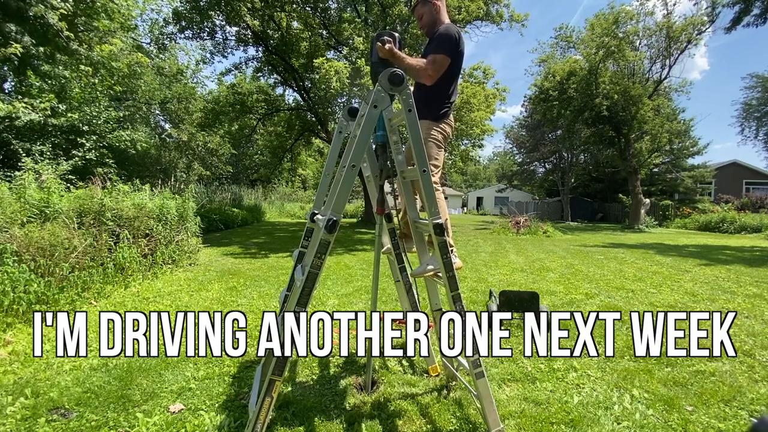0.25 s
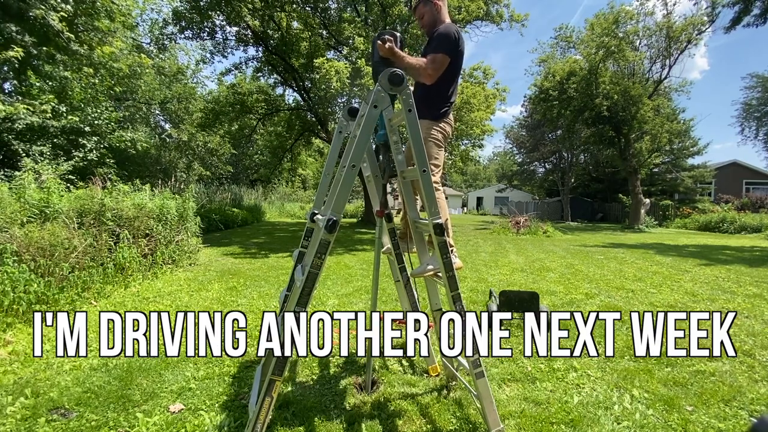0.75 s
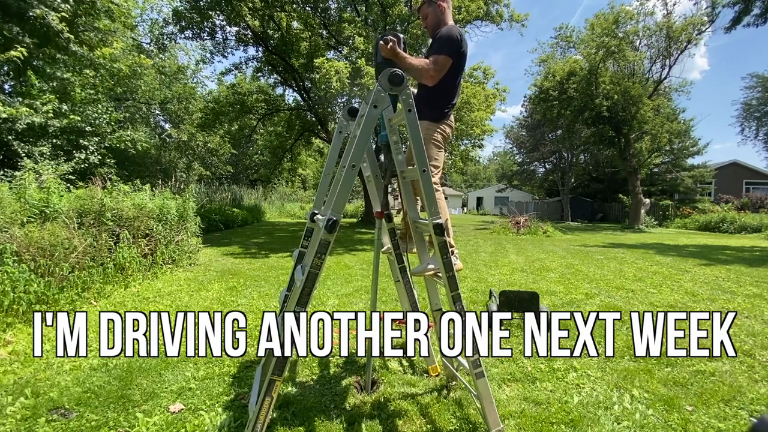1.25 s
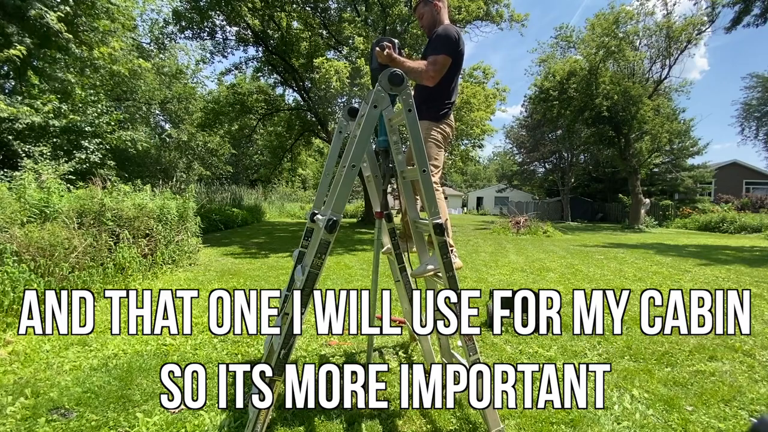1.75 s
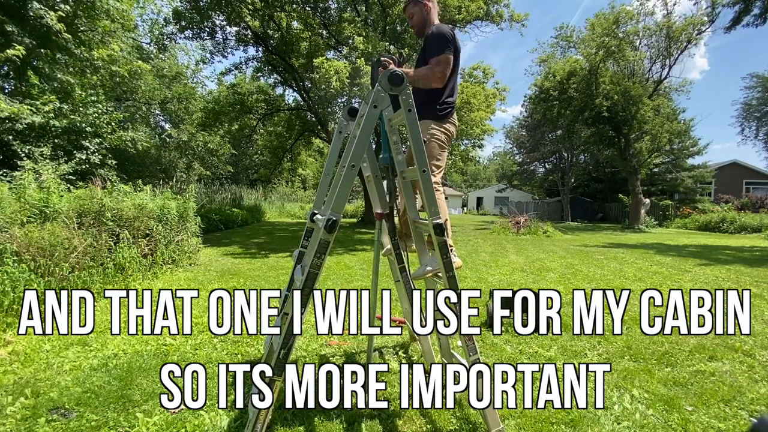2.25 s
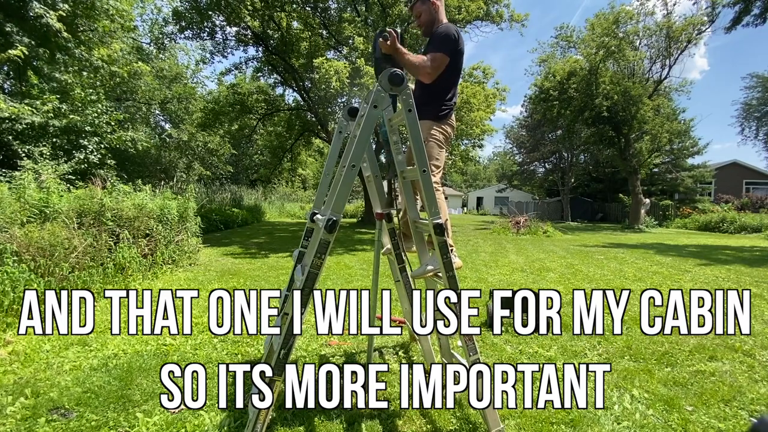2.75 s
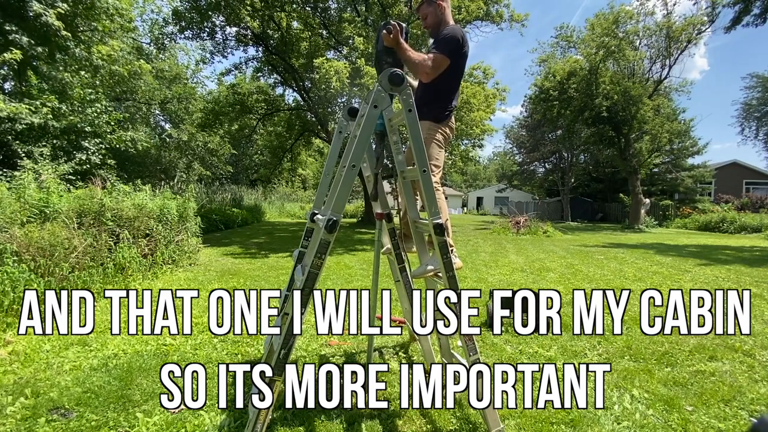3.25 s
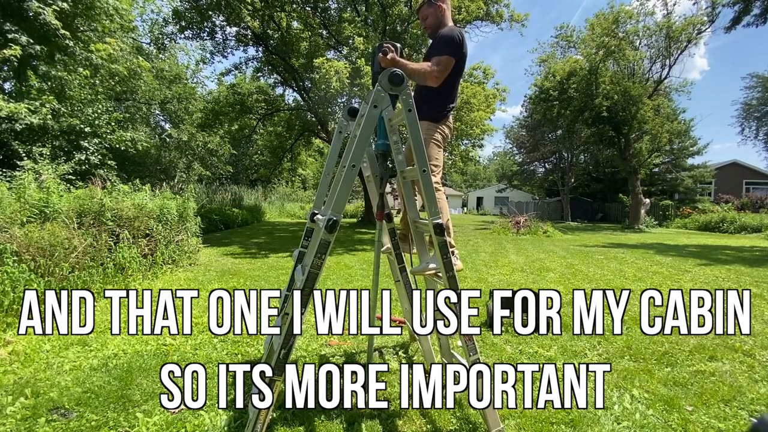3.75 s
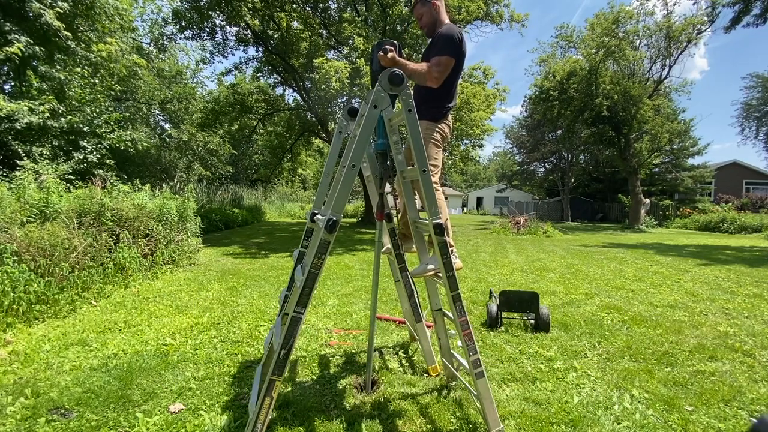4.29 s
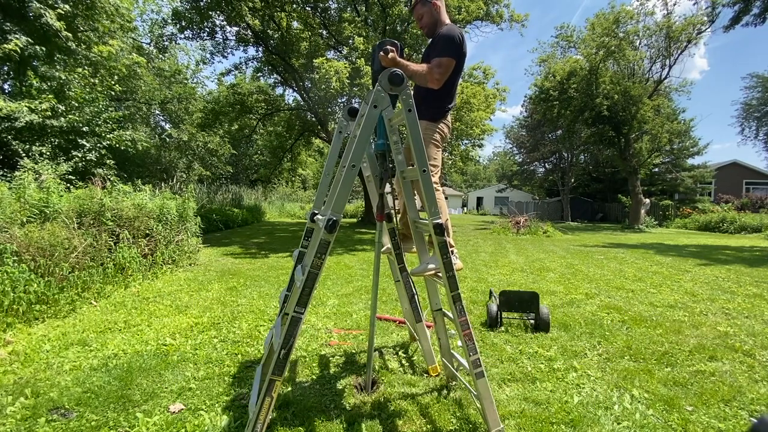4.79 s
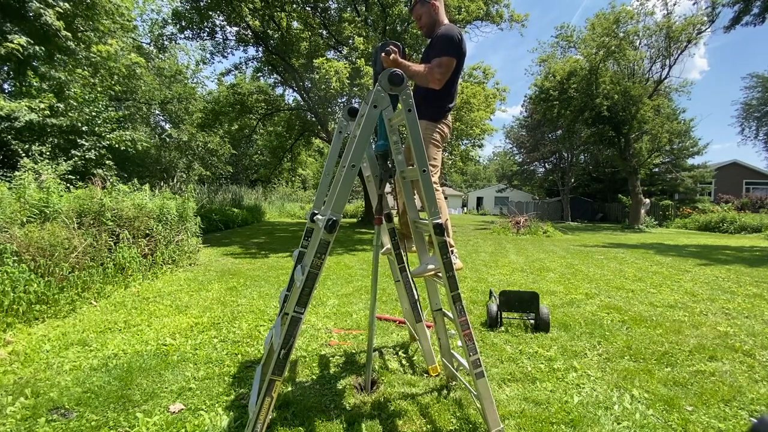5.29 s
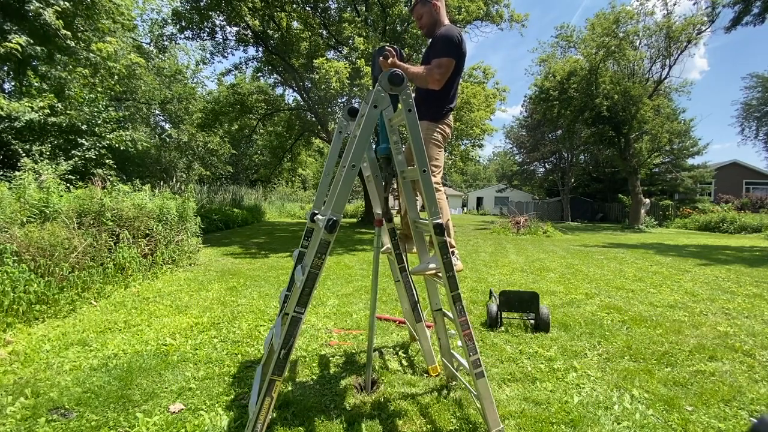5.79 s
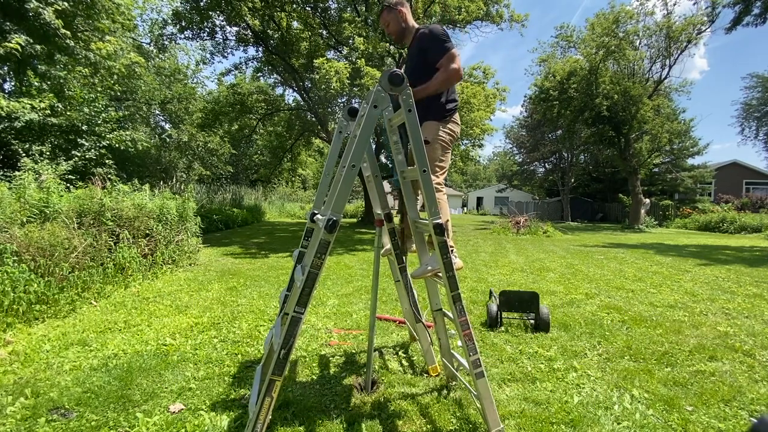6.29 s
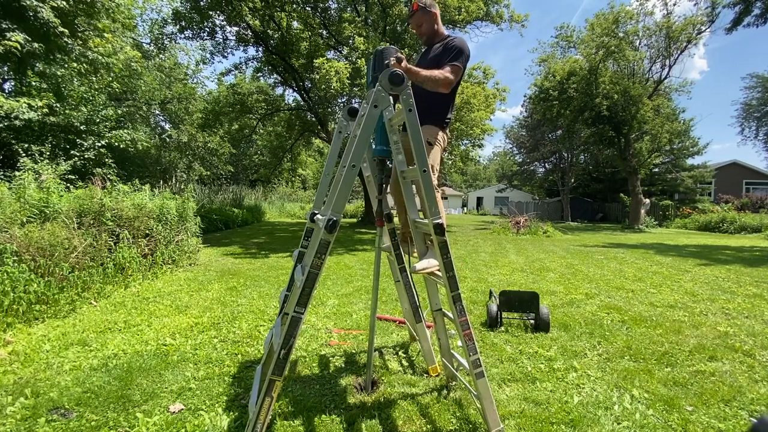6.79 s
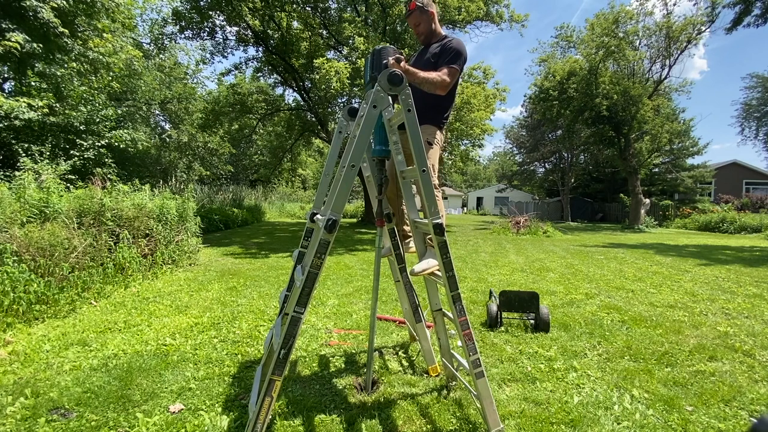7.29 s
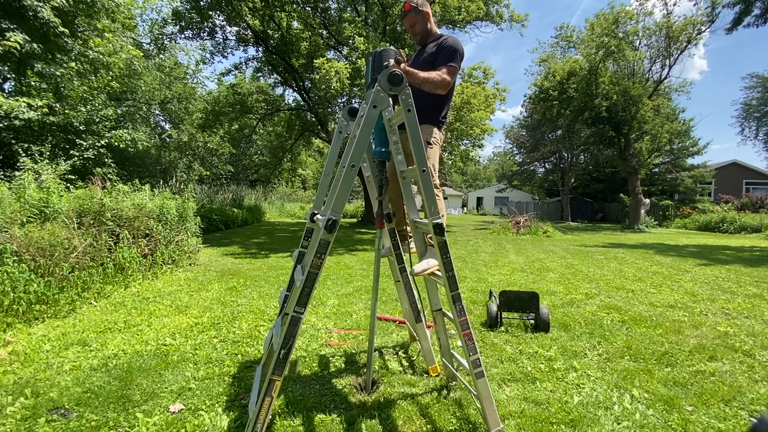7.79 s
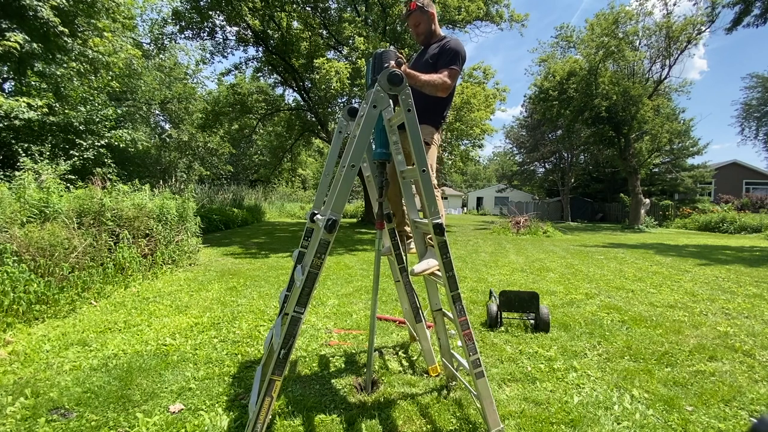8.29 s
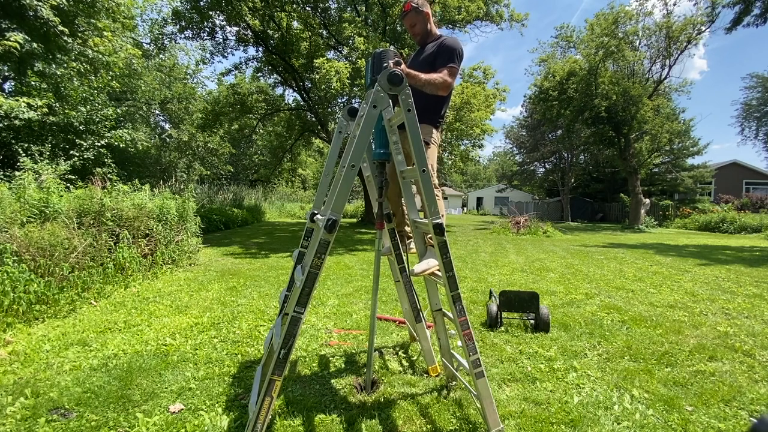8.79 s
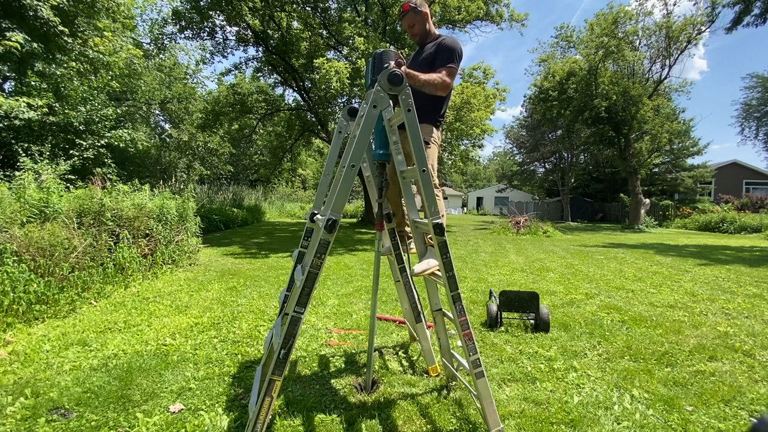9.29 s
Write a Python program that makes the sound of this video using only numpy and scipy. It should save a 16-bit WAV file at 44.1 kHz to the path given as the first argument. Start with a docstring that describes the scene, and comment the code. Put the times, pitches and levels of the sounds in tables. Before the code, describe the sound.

An electric jackhammer drives a steel pipe in a back yard, a few metres from the microphone. Two short bursts of fast, rattling blows ring with high metallic tones, then the motor idles down with gear noise and a thin whine. Light taps build into a longer burst. The motor runs down again, leaving a faint rumble of far traffic, before the blows return, ease off and pick up.

```python
"""A back yard, two-port microphone a few metres from an electric jackhammer driving a steel pipe. It opens on
two short bursts: each blow rattles steel on the cap, and the bit bounces free, rings, and is muted on landing.
From 2.3 s the motor idles down: gear noise, piston chuffs, a thin whine. Light taps at 3.5 s build to a long
burst; after 6.2 s the motor runs down again, leaving far traffic to rumble and hum. From 7.3 s the blows
return, ease off and pick up to the end."""
import sys
import numpy as np
from scipy import signal
from scipy.fft import rfft, irfft, next_fast_len
from scipy.io import wavfile
from scipy.ndimage import uniform_filter1d, map_coordinates

SR = 44100
rng = np.random.default_rng(int(sys.argv[2]) if len(sys.argv) > 2 else 0)


def wav_out(sig):
    """Save sig, one row per channel (or a flat mono array), as 16-bit PCM at SR to the path in sys.argv[1]."""
    wavfile.write(sys.argv[1], SR, np.round(np.clip(np.atleast_2d(sig).T, -1, 1) * 32767).astype(np.int16))


N = 420713
TIME = np.arange(N) / SR

# bit meets cap: t/s, rattle/dB, free flight/s, 5 kHz ring/dB, 6 kHz ring/dB, upper ring/dB
CONTACTS = [(0.161, -16.5, .091, -29, -38, -34), (0.2439, -12, .074, -53, -60, -43.5),
            (0.3378, -15.5, .056, -42.5, -39, -44), (0.4323, -14.5, .066, -38.5, -34, -45),
            (0.5304, -17, .08, -32.5, -34.5, -35.5), (.6306, -13.5, .057, -56, -62, -50.5),
            (.73, -15, .13, -38.5, -37, -39.5), (.832, -31.5, .037, -48, -42.5, -43),
            (.862, -41, .0645, -42.5, -40, -46.5), (0.9848, -14.5, .076, -31, -22, -32.5),
            (1.0662, -14.5, .043, -30, -23, -35.5), (1.117, -35, .12, -47, -28, -38),
            (1.203, -40, .048, -50, -34, -38.5), (1.254, -42, .17, -56, -36, -32.5),
            (1.385, -40.5, .32, -58, -60, -65), (1.9101, -14, .062, -28.5, -21.5, -30.5),
            (1.9784, -11.5, .024, -64, -24, -26.5), (2.002, -34, .037, -51.5, -38, -42),
            (2.054, -16.5, .084, -35, -23.5, -41), (2.1374, -21.5, .024, -54.5, -21.5, -35),
            (2.2212, -18, .095, -56, -37.5, -37.5), (2.315, -43, .15, -66, -56, -50),
            (3.467, -34.5, .025, -54, -48, -52), (3.4892, -31, .062, -56.5, -60.5, -58),
            (3.5532, -33.5, .18, -74, -83, -73), (3.7062, -28, .023, -47.5, -67, -46.5),
            (3.9196, -30, .037, -56, -47, -56), (4.1517, -25, .037, -50, -54, -60),
            (4.348, -28.5, .038, -61, -56, -65), (4.4774, -19.5, .03, -35.5, -62, -39.5),
            (4.5907, -17, .059, -40, -43, -43), (4.7897, -13.5, .037, -32.5, -46, -40),
            (4.879, -14, .074, -42, -52, -43.5), (4.9676, -14.5, .089, -31.5, -46, -34.5),
            (5.057, -14.5, .062, -56, -55, -39.5), (5.1427, -15, .066, -41.5, -40.5, -40),
            (5.2298, -13.5, .068, -30.5, -46.5, -45), (5.3168, -13, .028, -33.5, -64.5, -43.5),
            (5.4058, -15, .055, -55, -60.5, -65), (5.501, -26, .082, -40.5, -34, -43),
            (5.652, -22.5, .14, -43.5, -25, -42), (5.74, -14.5, .13, -40, -20.5, -34),
            (5.832, -19, .116, -34.5, -18, -35.5), (5.949, -28, .16, -59.5, -48, -50),
            (6.038, -43, .03, -65, -58, -62), (6.079, -22, .093, -44.5, -37.5, -48),
            (6.166, -36, .2, -72, -58, -64.5), (7.2885, -25.5, .036, -53, -44.5, -53),
            (7.4199, -18.5, .04, -38.5, -36, -40), (7.5326, -14, .077, -39.5, -41, -43.5),
            (7.6294, -27.5, .05, -57, -62, -61), (7.7307, -16, .085, -42.5, -25.5, -33.5),
            (7.82, -15, .072, -37, -42, -45), (7.916, -16.5, .099, -44.5, -36.5, -36.5),
            (8.0231, -18, .016, -44, -51, -55), (8.041, -42, .033, -44, -60, -56.5),
            (8.1436, -15.5, .042, -36.5, -58, -42), (8.2873, -20.5, .025, -51, -57.5, -55.5),
            (8.3136, -31.5, .026, -34, -60, -48), (8.4623, -29, .051, -65, -57, -64),
            (8.6772, -26.5, .032, -52.5, -73, -74), (8.8617, -29, .026, -66, -61, -61),
            (8.9957, -19, .033, -33, -49, -47), (9.111, -16, .048, -30.5, -38, -33.5),
            (9.217, -13, .04, -49.5, -35.5, -39), (9.318, -15.5, .077, -30, -42, -39.5)]
PIPE_MODES = [(830, 130, -3), (1300, 81, -2), (1660, 30, -5.5), (2528, 68, -3), (2997, 210, -8.5),
              (6340, 210, 3.5)]  # fuzzy modes of pipe and cap: f/Hz, width/Hz, level/dB
KNOCKS = [(1.9783, -32), (2.054, -38), (3.5524, -39), (6.166, -52), (9.4667, -53)]  # low knocks: t/s, level/dB
# spectra of the parts of a blow: f/Hz, level/dB
RATTLE_EQ = [(300, -34.5), (600, -8), (900, -5), (2000, 1), (4000, 1), (5500, 3.5), (7000, -16.5),
             (9000, -35)]
SIZZLE_EQ = [(4500, -27.5), (6400, 2.5), (7500, 0), (8400, 1), (9500, -3), (11000, -0.5), (12200, 3),
             (13500, -4), (16000, -11.5), (17000, -35.5)]
THUD_EQ = [(30, -28.5), (70, -0.5), (150, -3.5), (280, -2), (500, -2), (900, -36)]
KNOCK_EQ = [(40, -24.5), (100, -8), (250, -1), (400, -3.5), (900, -33)]
# modes of the bit: f/Hz, t60/s, beat/Hz, beat depth/0-1, flutter/dB, bend under load/0-1
BIT_MODES = [(5021, 0.34, 33, 0.4, 3, 0.5), (5990, 0.66, 6, 0.4, 1.23, 0.98),
             (8145, 0.38, 29, 0.5, 2.4, 0.2), (11860, .5, 52, 0.4, 2, 0.1), (15655, .35, 38, .4, 3.5, 0.1)]
# its modes above 6 kHz: share of the 5 kHz ring in a mix with the upper ring/0-1, level/dB re that mix
UPPER_MODES = [(.45, -3), (0, -0.5), (0.05, -3)]
# modes that ring along: f/Hz, leader near f/Hz, level/dB re leader, extra loss/(dB/s), dB per dB of rattle
PARTNER_MODES = [(2536, 5981, -17, 90, .5), (12905, 8125, -6, 0, 0)]
# the bit slides onto the cap and stiffens, its pitch climbing until landing: contact t/s, rise/0-1
PITCH_RISES = [(.864, .025), (5.5015, .045), (7.819, .03)]
SWELLS = [(.862, 0), (5.74, 22), (7.7307, 31), (7.916, 15)]  # the pipe feeds the 5 kHz mode in flight: contact t/s, gain by landing/dB
GEAR_LEVEL = [(0, -43), (.5, -44.5), (1.3, -45), (1.85, -42.5), (2.3, -47), (2.9, -51.5), (4.2, -55),
              (4.7, -44), (5.3, -42), (5.9, -44.5), (6.3, -55), (6.86, -61), (6.885, -68), (7.3, -51),
              (7.8, -42.5), (8.7, -54), (9.1, -44.5), (9.54, -47)]  # gear noise: t/s, level/dB
# spectra of gears and fan: f/Hz, level/dB
GEAR_EQ = [(120, -37.5), (200, -11.5), (444, -9), (573, -7.5), (751, -5), (1640, -1), (1790, -5.5),
           (2220, -3), (6000, -21.5), (7800, -50), (13200, -120)]
FAN_EQ = [(2300, -29.5), (4000, -3.5), (8800, -7), (11700, -9), (12600, -6), (13300, -41.5)]
# runs of strokes that miss the bit: first t/s, count, first period/s, ratio of each period to the last
IDLE_RUNS = [(.076, 1, .09, 1), (.905, 1, .08, 1), (1.305, 1, .07, 1), (1.447, 7, .066, 1),
             (2.3, 11, .0835, 1.056), (4.695, 1, .1, 1), (6.335, 4, .157, 1.095), (9.415, 2, .075, 1)]
# parts of a piston stroke: offset/periods, chuff/dB re gears, tick/dB re fan
STROKE_PARTS = [(-.2, 9.5, 4), (0.001, 9, 14), (.33, 6, 3)]
WHINES = [
    [(1.4, 4080, -60), (1.65, 4430, -57), (1.85, 4650, -59)],
    [(2.5, 3150, -73), (2.8, 2680, -71), (3.2, 2220, -76), (3.46, 1800, -75)],
    [(6.3, 2550, -81), (6.87, 1990, -83)],
    [(8.86, 1870, -57), (9.17, 2990, -52)],
]  # stretches of commutator whine: t/s, bar rate/Hz, level/dB
WHINE_HARMONICS = [
    [2],
    [4, 5, 6],
    [3],
    [1],
]  # multiples of the bar rate heard in each stretch
TRAFFIC_LEVEL = [(0, -61.5), (2, -65.5), (3.3, -63.5), (5, -58.5), (6.5, -60.5), (8.7, -54), (9.54, -57)]  # far rumble: t/s, level/dB
TRAFFIC_EQ = [(20, -51.5), (34, -12.5), (55, 0), (95, -1), (125, -8.5), (180, -14.5), (450, -17),
              (900, -16.5), (1500, -43.5)]  # its spectrum: f/Hz, level/dB
ENGINE_HUM = [(1.1, 72, -74.5), (1.5, 74, -68.5), (2.3, 86, -60.5), (3.4, 96, -67.5), (4.3, 106, -59.5),
              (4.6, 108, -70.5), (5.6, 88, -73.5), (6.2, 87, -55), (6.8, 87, -53), (6.95, 87, -82)]  # far engine: t/s, f/Hz, level/dB
# microphone ports: f/Hz, left minus right/dB, left phase lead/rad, coherence/0-1
MIC_PORTS = [(90, -5, 0.03, 0.5), (250, -6.5, -0.6, 1), (420, -9, -3, 0.4), (530, -7.5, -3, .9),
             (705, 2, -4.5, 1), (1220, -2.5, -5.5, 0.99), (1600, -3.9, -5.5, .93), (3130, -1, -5.5, 0.6),
             (4630, 0.1, -5, 0.9), (5900, -1.5, -5.5, 0.4), (8005, -3.8, -8, 0.4), (8530, -9.5, -8, 0.4),
             (10420, 3, -12, 1), (10940, -2, -11, .85), (12800, 0, -16, 1), (16100, -0.5, -24, 0.96),
             (16110, 0.5, -15, .93)]

BLOW_SCATTER_DB, STROKE_SCATTER_DB = 1.5, 2.2  # chance variation from one to the next
THUD_DB, THUD_SLOPE = -40.5, .75  # at a -14.5 dB blow; dB per dB of rattle
TREBLE_DB, TREBLE_SLOPE = -1, .079  # sizzle re rattle at a -15.5 dB blow; dB per dB of rattle
FAN_DB, FAN_SLOPE = -55.5, 1.42  # at a gear level of -45 dB; dB per dB of it
LATE_CYCLES = 2.5  # low tones travel slower along the pipe: each arrives this many of its cycles late
STRUCK_DB = -33.2  # louder contacts count as piston strokes
TOP_HZ = 17000


def pipe():
    """Steel cracks and chatters on the cap; the shock reaches the soil a little later as a thud."""
    def modes(f, spread):
        return sum(amp(db) / (1 + ((f - hz) / (spread * width)) ** 2) for hz, width, db in PIPE_MODES)

    def body(f):
        dispersion = np.exp(-2j * np.pi * LATE_CYCLES * np.log(f + 1))
        return amp(along(RATTLE_EQ, f)) * (1 + 1.6 * modes(f, 1.3)) * dispersion

    times, db = np.transpose(CONTACTS)[:2]
    chance_db = BLOW_SCATTER_DB * rng.standard_normal((len(times), 2))
    sizzle_db = db + TREBLE_DB + TREBLE_SLOPE * (db + 15.5) + chance_db[:, 0]
    thud_db = THUD_DB + THUD_SLOPE * (db + 14.5) + chance_db[:, 1]
    rattle_shape = bounced(blow(.0011, .0038, .048, -22, .2), delay_s=.023, db=-19.5)
    rattle = bursts(times, db + .2, rattle_shape, body, spiky_db=3.5)
    sizzle_shape = bounced(blow(.00044, .0027, .051, -24.5, .17), delay_s=.021, db=-16)
    sizzle = bursts(times, sizzle_db, sizzle_shape, eq(SIZZLE_EQ), spiky_db=3.5)
    # the housing shivers after the blow, in the colour of its air vents
    shiver = bursts(times, sizzle_db - 21.5, blow(.002, 0, .45, -60, 1), eq(FAN_EQ), spiky_db=1.5)
    thud = bursts(times, thud_db, blow(.003, .011, .061, -23, .34, lag=.003), eq(THUD_EQ), spiky_db=.5)
    knock_shape = blow(.0032, .014, .068, -23, .3, lag=.0029)
    knock = bursts(*np.transpose(KNOCKS), knock_shape, eq(KNOCK_EQ), spiky_db=.5)
    crack = bursts(times, db + 1, blow(.0002, .00045, .008, -62, 1), body, spiky_db=2)
    # the narrow cores of the modes outlast the chatter
    clank_shape = blow(.0062, .0055, .16, -61.5, .96)
    clank = bursts(times, db - 12.5, clank_shape, lambda f: modes(f, .85), spiky_db=0)
    return crack + rattle + sizzle + shiver + thud + knock + clank


def bit():
    """Each contact resets the bit's modes; they ring in free flight and are choked on landing."""
    times, rattle_db, flights, ring5_db, ring6_db, upper_db = np.transpose(CONTACTS)
    last = np.searchsorted(times, TIME) - 1  # latest contact at each sample
    age = np.maximum(TIME - times[last], 0)
    flight = flights[last]

    def in_flight(rows, power):
        at_landing = sum(value * (np.abs(times - t) < .005) for t, value in rows)
        return at_landing[last] * np.clip(age / flight, 0, 1) ** power

    rings_db = [ring5_db, ring6_db]
    chances_db = BLOW_SCATTER_DB * rng.standard_normal((len(times), len(UPPER_MODES)))
    for (share, db), chance_db in zip(UPPER_MODES, chances_db.T):
        rings_db.append(share * ring5_db + (1 - share) * upper_db + db + chance_db)
    choke_db = -60 * np.maximum(age - flight, 0) / .062
    rise, swell_db = in_flight(PITCH_RISES, power=2.1), in_flight(SWELLS, power=.92)
    draws = rng.uniform(-1, 1, (len(times), len(BIT_MODES), 3))
    ring = np.zeros(N)
    for k, (hz, t60, beat_hz, depth, flutter_db, bend) in enumerate(BIT_MODES):
        grip, twin_phase, phase = draws[last, k].T
        fade_db = -60 * (age - .025) / t60 + swell_db * (k == 0)
        level = uniform_filter1d(amp(rings_db[k][last] + 6 + fade_db + choke_db) * (last >= 0), size=60)
        level *= amp(flutter_db * (wobble(70) + .89 * wobble(260)))
        # the grip differs from blow to blow and trembles: the pitch shifts a little
        turn = phase_of(1 + bend * rise + .0017 * grip + .0012 * wobble(90))
        twin = depth * np.sin((hz + beat_hz) * turn + np.pi * twin_phase)  # a close mode that beats
        ring += level * (np.sin(hz * turn + np.pi * phase) + twin) / np.hypot(1, depth)
        for partner_hz, leader_hz, db, loss, slope in PARTNER_MODES:
            if abs(leader_hz / hz - 1) < .06:
                partner_db = db - loss * age + slope * (rattle_db[last] + 15) + 3 * wobble(12)
                ring += level * amp(partner_db) * np.sin(partner_hz * turn)
    return ring


def motor():
    """Gears grind and the fan hisses; the piston chuffs and ticks in the same two colours."""
    gear_db, = curves(GEAR_LEVEL)
    fan_db = FAN_DB + FAN_SLOPE * (gear_db + 45)
    grind = wobble(45)
    grit = patchy(depth_db=2) * amp(2.3 * wobble(700))
    gears = amp(gear_db - 1.9 + 2.4 * grind) * unit(filtered(grit, eq(GEAR_EQ)))
    fan = amp(fan_db + 1.1 * grind) * unit(filtered(rng.standard_normal((2, N)), eq(FAN_EQ)))
    return gears + fan + piston(gear_db, fan_db)


def piston(gear_db, fan_db):
    """Every stroke, struck or missed, gives three chuffs, each with a bright tick."""
    missed = [first + period * sum(growth ** j for j in range(k))
              for first, count, period, growth in IDLE_RUNS for k in range(count)]
    strokes = np.sort(missed + [t for t, db, *_ in CONTACTS if db > STRUCK_DB])
    strokes = strokes[np.diff(strokes, prepend=-1) > .05]
    periods = np.clip(np.diff(strokes, prepend=0), .06, .2)
    offset, chuff_db, tick_db = np.transpose(STROKE_PARTS)
    times = strokes[:, None] + offset * periods[:, None]
    chance_db = STROKE_SCATTER_DB * rng.standard_normal(times.shape)
    at = (times * SR).astype(int)
    chuff_shape, tick_shape = blow(.0041, .0016, .063, -24, .15), blow(.0017, .0013, .028, -24.5, .11)
    chuff = bursts(times, gear_db[at] + chuff_db + chance_db, chuff_shape, eq(GEAR_EQ), spiky_db=-1.5)
    tick = bursts(times, fan_db[at] + tick_db + chance_db, tick_shape, eq(FAN_EQ), spiky_db=8.5)
    return chuff + tick


def commutator():
    """A thin whine at multiples of the bar rate, shared by both ports."""
    whine = np.zeros(N)
    for rows, harmonics in zip(WHINES, WHINE_HARMONICS):
        hz, db = curves(rows)
        phase = phase_of(hz * (1 + .0027 * wobble(80)))
        on = (TIME > rows[0][0]) & (TIME < rows[-1][0])
        for k in harmonics:
            # the housing lets the higher multiples out only around 11.6 kHz
            housing = 1 / (1 + ((k * hz - 11600) / 1000) ** 4) if k > 3 else 1
            whine += on * housing * amp(db + 3 * wobble(9.2)) * np.sin(k * phase)
    return whine * [[1], [0]]


def traffic():
    """Far beyond the yard: low rumble in lumps and the hum of one engine."""
    rumble = unit(filtered(rng.standard_normal((2, N)), eq(TRAFFIC_EQ)))
    hz, hum_db = curves(ENGINE_HUM)
    hum = amp(hum_db + .5 + 1.9 * wobble(8.8)) * np.sin(phase_of(hz + .8 * wobble(9.7)))
    rumble_db, = curves(TRAFFIC_LEVEL)
    return amp(rumble_db + 2.5 + 2.2 * wobble(8)) * rumble + hum * [[1], [0]]


def microphone(pair):
    """Left and right from a shared and an unshared sound, with the ports' level and phase offsets."""
    def blend(f):
        angle = np.arccos(np.clip(along(MIC_PORTS, f, column=3), 0, 1)) / 2
        return np.array([np.cos(angle), np.sin(angle)])

    def offsets(f):
        half = amp(along(MIC_PORTS, f) / 2) * np.exp(.5j * along(MIC_PORTS, f, column=2))
        return np.array([half, 1 / half])

    shared, unshared = filtered(pair, blend)
    return filtered(np.array([shared + unshared, shared - unshared]), offsets)


def blow(attack, hold, t60, tail_db, tail_t60, lag=0):
    """Envelope of a blow, times in s: rise, hold, quick fall, and a weaker tail."""
    t = np.maximum(TIME[:SR // 3] - lag, 0)
    after = np.maximum(t - hold, 0)
    return (1 - np.exp(-t / attack)) * (amp(-60 * after / t60) + amp(tail_db - 60 * t / tail_t60))


def bounced(shape, delay_s, db):
    """The envelope with a weaker second landing."""
    return np.hypot(shape, amp(db) * np.pad(shape, (int(delay_s * SR), 0))[:len(shape)])


def bursts(times, levels_db, shape, colour, spiky_db):
    """Two unrelated noises under one envelope per event, coloured at constant power."""
    marks = np.bincount((np.ravel(times) * SR).astype(int), amp(np.ravel(levels_db)) ** 2, N)
    envelope = np.sqrt(np.abs(signal.fftconvolve(marks, shape ** 2)[:N]))
    noise = rng.standard_normal((2, N)) * amp(spiky_db * wobble(900))
    colour_rms = np.sqrt(np.mean(np.abs(colour(np.linspace(0, SR / 2, num=4096))) ** 2))
    return filtered(envelope * unit(noise), colour) / colour_rms


def patchy(depth_db):
    """Two noises whose colour changes from moment to moment."""
    spectra = signal.stft(rng.standard_normal((2, N)), nperseg=256)[2]
    patches = uniform_filter1d(rng.standard_normal(spectra.shape[1:]), size=3, axis=0)
    patches = uniform_filter1d(patches, size=8, axis=1)
    return signal.istft(spectra * amp(depth_db * unit(patches)), nperseg=256)[1][:, :N]


def amp(db):
    """Gain of a level in dB."""
    return 10 ** (np.asarray(db) / 20)


def unit(x):
    """x at rms 1."""
    return x / np.sqrt(np.mean(x ** 2) + 1e-20)


def phase_of(hz):
    """Running phase in radians."""
    return 2 * np.pi * np.cumsum(hz) / SR


def along(rows, hz, column=1):
    """One column of a table, read on a log frequency axis."""
    columns = np.transpose(rows)
    return np.interp(np.log(hz + 1), np.log(columns[0] + 1), columns[column])


def eq(rows):
    """Frequency response from rows of f/Hz, level/dB."""
    return lambda f: amp(along(rows, f))


def curves(rows):
    """One value per sample for each column after the time."""
    times, *columns = np.transpose(rows)
    return [np.interp(TIME, times, column) for column in columns]


def wobble(rate):
    """A smooth random curve, rate knots a second."""
    return map_coordinates(rng.standard_normal(int(N * rate / SR) + 4), [TIME * rate], order=2)


def filtered(x, response):
    """x through a complex frequency response."""
    size = next_fast_len(N + 8192)
    return irfft(rfft(x, size) * response(np.fft.rfftfreq(size, 1 / SR)), size)[..., :N]


def scene():
    """Hammer a few metres off, traffic far behind, as the two ports hear them in the open air."""
    ring = bit()
    # the ringing bit turns in the chuck, so its image wanders
    steel = pipe() + np.array([ring, .77 * wobble(7.7) * ring])
    return microphone(steel + motor() + commutator() + traffic())


def record(dry):
    """Loud peaks are rounded off; the recorder keeps nothing above its band limit."""
    soft = dry / (1 + np.abs(dry / 1.05) ** 4) ** .25
    return filtered(soft, lambda hz: np.clip((TOP_HZ - hz) / 30, 0, 1))


dry = scene()
out = record(dry)
wav_out(out)
```